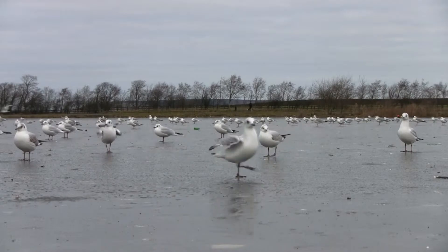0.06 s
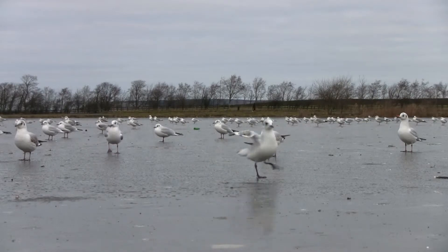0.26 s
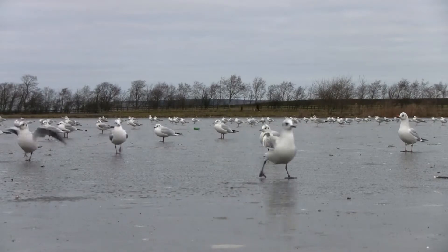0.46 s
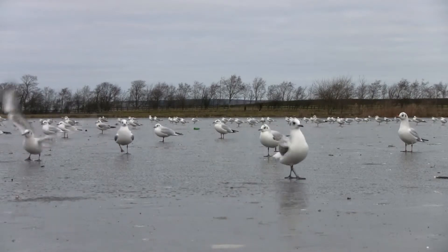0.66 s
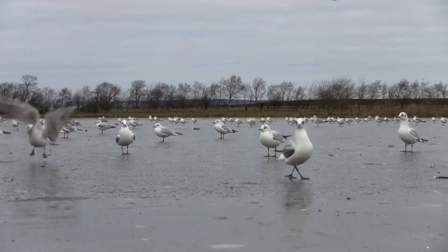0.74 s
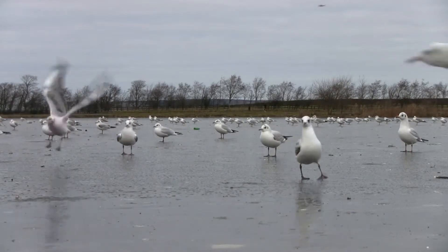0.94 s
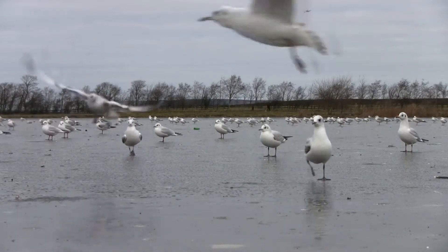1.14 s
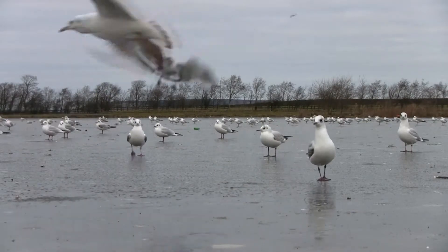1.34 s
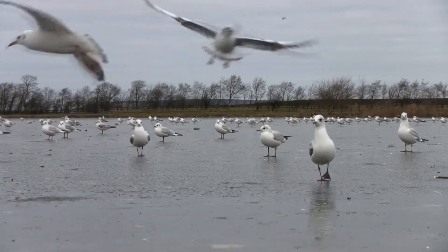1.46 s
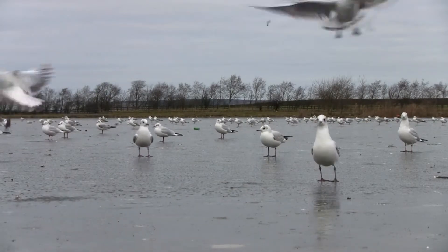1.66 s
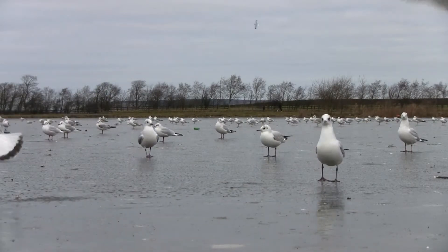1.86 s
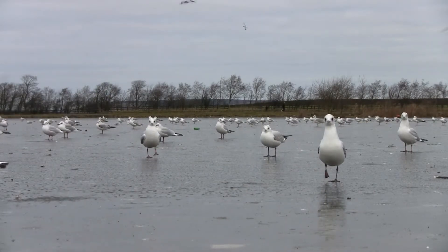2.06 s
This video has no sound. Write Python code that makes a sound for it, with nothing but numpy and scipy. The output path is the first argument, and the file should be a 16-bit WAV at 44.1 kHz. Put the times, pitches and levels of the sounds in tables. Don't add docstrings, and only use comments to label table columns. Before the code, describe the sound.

Loud harsh gull calls close by over a distant flock's murmur, with low wind thumps on the microphone

```python
import sys
import numpy as np
from scipy import signal
from scipy.fft import rfft, irfft, next_fast_len
from scipy.io import wavfile
from scipy.ndimage import uniform_filter1d, map_coordinates

SR = 44100
rng = np.random.default_rng(int(sys.argv[2]) if len(sys.argv) > 2 else 0)


def invert_db(x):
    u = np.asarray(x, float) / 20
    return 10 ** u


def dump_mix(stems):
    frames = np.atleast_2d(stems).T
    limited = np.clip(frames, -1, 1)
    pcm = np.round(limited * 32767).astype(np.int16)
    wavfile.write(sys.argv[1], SR, pcm)


N = 92610
T = np.arange(N) / SR
TOP_HZ = 15850


def unit(x):
    return x / np.sqrt(np.mean(np.abs(x) ** 2) + 1e-20)


def along(points, hz):
    f, v = np.transpose(points)
    return np.interp(np.log(hz + 1), np.log(f + 1), v)


def wobble(rate, size=N):
    knots = rng.standard_normal(int(size * rate / SR) + 4)
    return map_coordinates(knots, [np.arange(size) * rate / SR])


def filtered(x, response):
    m = next_fast_len(N + 8192)
    return irfft(rfft(x, m) * response(np.fft.rfftfreq(m, 1 / SR)), m)[..., :N]


# (time [s], level [dB])
GUSTS = [(0, -51.5), (.2, -44), (.33, -62), (.6, -60.5), (0.851, -52), (.93, -44), (1.099, -44.5),
         (1.3, -34), (1.5, -30), (1.62, -38), (1.8, -45.5), (1.98, -38.5), (2.1, -44)]
# (frequency [Hz], density [dB per Hz])
THUMP_SPECTRUM = [(25, -61), (60, -17), (170, 2), (300, 0.5), (500, -11.5), (1200, -72.5)]
# (frequency [Hz], lead [rad])
PORT_LEAD = [(30, 1.1), (130, 0.92), (300, 2.63), (700, 2.24)]


def wind():
    s, db = np.transpose(GUSTS)
    air = rng.standard_normal(N) + 0.61 * rng.standard_normal((2, N))
    air = air * invert_db(3.9 * wobble(60))

    def at_ports(hz):
        return invert_db(along(THUMP_SPECTRUM, hz)) * np.exp(.5j * along(PORT_LEAD, hz) * [[1], [-1]])

    pair = filtered(air, at_ports)
    gusts = pair / np.std(pair.mean(0)) * invert_db(np.interp(T, s, db) + [[.6], [-.6]])
    drone = filtered(rng.standard_normal(N), lambda hz: invert_db(along(THUMP_SPECTRUM, hz)) / (1 + (hz / 110) ** 4))
    return gusts + invert_db(-56.5) * unit(drone)


# (frequency [Hz], density [dB per Hz])
FLOCK_SPECTRUM = [(200, -55), (400, -15), (1400, -16.5), (2500, -28), (3500, -41), (6000, -44.5),
                  (16000, -54)]


def flock():
    z = signal.stft(rng.standard_normal((2, N)), nperseg=1024)[2]
    patches = uniform_filter1d(rng.standard_normal(z.shape[1:]), size=5, axis=0)
    patches = uniform_filter1d(patches, size=5, axis=1)
    pair = signal.istft(z * invert_db(2.0 * unit(patches)), nperseg=1024)[1][:, :N]

    def mid_and_side(hz):
        side_db = along([(400, -10.0), (1500, -13.0), (4000, -4.0), (10000, 0.0)], hz)
        return invert_db(along(FLOCK_SPECTRUM, hz)) * [np.ones_like(hz), invert_db(side_db)]

    mid, side = filtered(pair, mid_and_side)
    return invert_db(-48.5) * unit(np.array([mid + side, mid - side]))


def voice(rows, tone, jitter=0.017, smear_hz=600, edge_s=.003, open_share=.8, gap_db=-15, bend=0.087,
          tilt_db=0., spread=0.95, sub=0., order=2, restart=False, rise=3.2, trill=None, settle_s=0.0011,
          dull=0.13, swell_db=0., tire=0.):
    s, *cols = np.transpose(rows)
    t = T[(T > s[0] - edge_s) & (T < s[-1] + edge_s)]
    size = len(t)
    hz, db, rough, *rate = [np.interp(t, s, c) for c in cols]
    gate, arch = 1, 0
    if rate or trill:
        turn = np.interp(t, *np.transpose(trill)) if trill else np.cumsum(rate[0]) / SR
        turn = (turn + 0.019 * wobble(30.14, size)) % 1
        gap_db, bend = np.clip((t - t[0]) / settle_s, 0, 1) * [[gap_db], [bend]]
        bend = bend * (1.5 + tire * (db.max() - db))
        opened = np.clip(np.minimum(turn, 1 - turn) / np.clip(1 - open_share, .02, 1), 0, 1)
        gate = invert_db(gap_db * (1 - np.sin(np.pi / 2 * opened)) + swell_db * (turn - 1.0))
        arch = bend * (2 * turn - 1 - np.cos(2 * np.pi * turn) / 2)
    phase = 2 * np.pi * np.cumsum(hz * (1 + arch + jitter * wobble(400, size))) / SR
    if restart:
        turn_start = np.maximum.accumulate(phase * (np.diff(turn, prepend=0) < 0))
        phase = phase - turn_start + 1.2 * wobble(90, size)
    gate = gate * (1 + np.clip(sub * rough, 0, .9) * np.cos(phase / order))
    tilt_db = tilt_db + dull * (db - db.max())
    sound, power = 0, 0
    for m in range(1, min(int(TOP_HZ / hz.min()), 24) + 1):
        smear = (wobble(smear_hz, size) + 1j * wobble(smear_hz, size)) / np.sqrt(2)
        share = np.clip(rough * (m * hz / 2000) ** rise, 0, 1)
        gain = invert_db(along(tone, m * hz) + tilt_db * np.log2(m)) * (m * hz < TOP_HZ)
        overtone = (np.sqrt(1 - share) + np.sqrt(share) * smear) * np.exp(1j * (m * phase + spread * m * m))
        sound = sound + gain * np.real(overtone)
        power = power + gain ** 2 / 2
    fade = np.clip(np.minimum(t - t[0], t[-1] - t) / (2 * edge_s), 0, 1)
    out = np.zeros(N)
    out[round(t[0] * SR):][:size] = sound / np.sqrt(power) * gate * invert_db(db) * fade
    return out


def placed(x, pan_db, lag_us):
    pair = x * invert_db([[pan_db / 2], [-pan_db / 2]])
    return filtered(pair, lambda hz: np.exp(-1j * np.pi * hz * lag_us * 1e-6 * np.array([[1], [-1]])))


# (time [s], length [s], pitch [Hz], level [dB])
CHATTER = [
    (0.169, 0.071, 958, -46.5),
    (1.087, 0.13, 1169, -44.5),
    (1.165, .08, 902, -50.5),
    (1.898, 0.15, 984, -47),
]
# (time [s], pitch [Hz], level [dB], roughness [0-1])
WHISTLE = [(1.535, 2320, -36, 0.037), (1.57, 2303, -32.5, 0.038), (1.61, 2284, -32.5, 0.12),
           (1.65, 2155, -38, .3), (1.72, 2260, -33, 0.3), (1.78, 2184, -37, 0.086)]
HOOT = [
    (0.618, 250, -51.5, .2),
    (0.938, 242.8, -51, .2),
]
FALL = [(1.79, 1565, -46.5, .05), (1.839, 1530, -49, .05), (1.871, 1335, -51, .05), (1.911, 1068, -45, .05),
        (1.952, 988, -45, .05)]
PEEP = [
    (1.896, 1627, -53, 0),
    (1.94, 1495, -69, 0),
    (2.0, 1440, -54, 0),
]
MEW = [
    (.6, 1190, -35, .15),
    (.66, 1170, -35.5, 0.19),
    (.71, 1186, -45, 0.3),
]
# (frequency [Hz], level [dB])
FAR_TONE = [(900, -10), (2600, 4.5), (4000, -22), (6000, -33)]
THIN_TONE = [(1000, -19), (2500, 26), (3100, -1.5), (4600, -25), (6500, -28)]


def far_gulls():
    calls = 0
    for s, length, hz, db in CHATTER:
        # roughness, trill turns per s
        rows = [(s, hz, db - 9.0, .5, 85),
                (s + 0.3 * length, hz, db, .5, 85),
                (s + length, 0.63 * hz, db - 9.0, .5, 85)]
        calls = calls + voice(rows, FAR_TONE, jitter=0.04, edge_s=.008, open_share=1.0, gap_db=-29, rise=0.26)
    for rows in (WHISTLE, HOOT):
        calls = calls + voice(rows, [(1000, 1)], jitter=0.018, smear_hz=86.8, edge_s=0.0094, tilt_db=-25)
    for rows in (FALL, PEEP):
        calls = calls + voice(rows, THIN_TONE, jitter=0.011, smear_hz=204, edge_s=.008)
    calls = calls + voice(MEW, FAR_TONE, edge_s=.01, tilt_db=-2)
    return placed(calls, pan_db=-3.5, lag_us=-29)


# (frequency [Hz], time to fall 60 dB [s])
ICE_DECAY = [(500, 0.39), (3000, 0.53), (14000, 0.35)]


def ice(x):
    hz, t, z = signal.stft(rng.standard_normal((2, SR // 2)), SR, nperseg=256)
    tail = signal.istft(z * invert_db(-60 * t / along(ICE_DECAY, hz)[:, None]), SR, nperseg=256)[1]
    return signal.fftconvolve(x, tail / np.linalg.norm(tail[0]), axes=1)[:, :N]


# (time [s], pitch [Hz], level [dB], roughness [0-1])
CATCH = [
    (.2375, 783, -23, 0.04),
    (.246, 880, -46.5, 0),
]
SCREAM = [(.246, 950.5, -21, 0), (.28, 1039, -20.5, 0), (.31, 1158, -22.5, 0.13), (.36, 1120, -22.5, 0.05),
          (.41, 1154, -23.5, 0.11), (.46, 1067, -21, 0.04), (.51, 1020, -22.5, 0), (.57, 1047, -21, 0.03),
          (.612, 928, -22.5, 0)]
SLUMP = [(.614, 716, -26.5, 0.022), (.63, 741, -27, 0.017), (.644, 699.5, -26, 0.037),
         (.678, 705, -28.5, 0.035), (.69, 609, -26, 0.15), (.705, 533, -27, 0.15),
         (.72, 570.5, -28.5, 0.14), (.752, 447, -34, 0.16), (.78, 428, -42, .3)]
# (time [s], turns made [count])
SCREAM_TRILL = [(.246, 0), (.2727, 2), (.3217, 7), (.3377, 9), (.4203, 18), (.4904, 25), (.5164, 27),
                (.5952, 33), (.6133, 34)]
# (frequency [Hz], level [dB])
SCREAM_TONE = [(1150, -20), (2100, 2.5), (3000, -14), (4000, -21), (5100, -12.5), (6500, -14.5),
               (8200, -30.5), (15000, -41)]
SLUMP_TONE = [(600, -11.5), (1450, -1), (2100, 5.5), (3500, -21.5), (4250, -6), (5000, -15.5), (7000, -15),
              (9000, -36)]


def screamer():
    catch = voice(CATCH, SCREAM_TONE, jitter=0.1, edge_s=.0007, tilt_db=-7)
    scream = voice(SCREAM, SCREAM_TONE, jitter=.006, smear_hz=1200, edge_s=.0015, trill=SCREAM_TRILL,
                   settle_s=.035, open_share=.86, gap_db=-18, bend=.03, sub=2, order=3)
    scream = filtered(scream, lambda hz: 1 - .75 * np.exp(-((hz - 3700) / 300) ** 2))
    slump = voice(SLUMP, SLUMP_TONE, jitter=0.0072)
    return placed(catch + scream + slump, pan_db=-2.0, lag_us=22.0)


# (time [s], pitch [Hz], level [dB], roughness [0-1])
RATTLE = [(.69, 972, -31.5, 0.19), (.73, 908, -23, 0.042), (.85, 898, -23, 0.098), (.95, 891, -23.5, 0.048),
          (1.02, 814, -28, 0.13), (1.07, 767, -31, 0.053), (1.1, 750, -38, 0.05)]
# (time [s], turns made [count])
RATTLE_TRILL = [(.678, 0), (.7115, 3), (.8581, 16), (.9616, 25), (1.0594, 33), (1.0725, 34), (1.1057, 36)]
# (frequency [Hz], level [dB])
RATTLE_TONE = [(950, -9), (1500, -8), (2200, -1), (3700, 0), (4800, -8), (5600, -7), (8500, -23.5),
               (15000, -37.5)]


def rattler():
    rattle = voice(RATTLE, RATTLE_TONE, jitter=.022, smear_hz=1200, bend=.12, sub=4, order=2, restart=True,
                   rise=1.3, open_share=.64, gap_db=-24, spread=.4, edge_s=.008, trill=RATTLE_TRILL,
                   settle_s=.04, dull=.65, swell_db=2.5, tire=.08)
    beak_hz, width_hz, ring = 3600, 700, .6

    def beak(hz):
        return 0.91 + ring * 1j * hz * width_hz / (beak_hz ** 2 - hz ** 2 + 1j * hz * width_hz)

    return placed(filtered(rattle, beak), pan_db=0.0, lag_us=-22)


# (time [s], pitch [Hz], level [dB], roughness [0-1])
GULP = [
    (1.39, 590, -38, 0.26),
    (1.396, 624, -30, 0.18),
    (1.405, 745, -32, 0.17),
]
YELP = [
    (1.406, 1228, -29.5, .1),
    (1.416, 1366, -29.5, 0.068),
    (1.428, 1466, -26.5, 0.12),
]
SQUEAK = [
    (1.428, 1860, -27, 0),
    (1.434, 1900, -30, 0.18),
    (1.438, 1670, -32, 0.2),
    (1.444, 2000, -33, .1),
]
SQUEAL = [(1.441, 1879, -25, .12), (1.452, 1911, -24.5, 0.02), (1.47, 1916, -23.5, 0.0059),
          (1.495, 1864, -28, 0.014), (1.512, 1774, -33, 0.11), (1.525, 1821, -29.5, 0.017),
          (1.565, 1723, -26, 0.02), (1.61, 1719, -29, 0.027), (1.645, 1622, -28, 0.044)]
SAG = [(1.646, 1480, -31, .2), (1.65, 1364, -28.5, .04), (1.68, 1297, -31.5, .08), (1.71, 1350, -35, .08),
       (1.73, 1287, -35, .1), (1.75, 1063, -42, .12), (1.785, 850, -43, .15)]
CROAK = [
    (1.785, 531, -31.5, 0.3),
    (1.81, 436.5, -35, 0.15),
    (1.83, 386.5, -39, 0.045),
    (1.85, 385, -45, 0.17),
]
# (time [s], pitch [Hz], level [dB], roughness [0-1], trill rate [turns per s])
RASP = [(1.5, 1180, -42, .8, 88), (1.51, 1180, -35, .8, 88), (1.55, 1150, -36, .8, 88),
        (1.57, 1120, -48, .8, 88), (1.61, 1100, -40, .8, 88), (1.645, 1050, -40, .8, 88)]
# (frequency [Hz], level [dB])
YELP_TONE = [(1300, -0.5), (2000, 12), (2700, -12.5), (4100, -19), (5500, -12), (7000, -10), (8500, -30),
             (15000, -30)]
SQUEAL_TONE = [(400, -9), (1900, 3), (3700, 2.5), (5500, 5.5), (7400, 1.5), (8800, -12), (11000, -11.5),
               (15000, -33)]
SAG_TONE = [(700, -36), (1350, 4.5), (2600, 0), (4000, -1), (5300, 1), (6700, -5), (9000, -18),
            (15000, -21)]
CROAK_TONE = [(400, -0.5), (900, -3), (1500, 8), (2500, -15), (4200, -5.5), (7000, -33)]


def squealer():
    gulp = voice(GULP, YELP_TONE, jitter=0.049, tilt_db=-1, edge_s=0.0014, rise=0.92)
    yelp = voice(YELP, YELP_TONE, jitter=.015, rise=1)
    squeak = voice(SQUEAK, SQUEAL_TONE, jitter=0.01, tilt_db=3.5, edge_s=.0015, rise=0.4, sub=5.7, order=3)
    squeal = voice(SQUEAL, SQUEAL_TONE, jitter=.004, smear_hz=1500, rise=1, sub=3, order=3)
    rasp = voice(RASP, RATTLE_TONE, smear_hz=1500, tilt_db=5, rise=.3, open_share=.4, gap_db=-14, dull=0.)
    sag = voice(SAG, SAG_TONE, jitter=.005, smear_hz=900, rise=1, sub=4, dull=.8)
    croak = voice(CROAK, CROAK_TONE, jitter=0.031, spread=.33, edge_s=0.0056)
    return placed(gulp + yelp + squeak + squeal + rasp + sag + croak, pan_db=-1.5, lag_us=6.9)


def scene():
    far = far_gulls()
    near = screamer() + rattler() + squealer()
    echo = ice(invert_db(-13.0) * near + invert_db(-12.5) * far)
    return wind() + flock() + far + near + echo


def low_pass(x):
    return signal.sosfilt(signal.butter(12, 16330, fs=SR, output="sos"), x)


def record(dry):
    mix = filtered(dry, lambda hz: hz < TOP_HZ)
    return low_pass(mix)


dry = scene()
out = record(dry)
dump_mix(out)
```